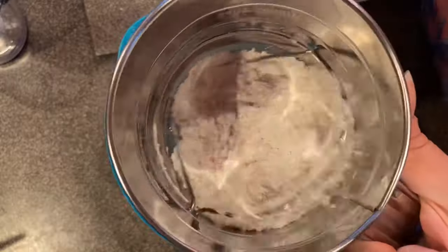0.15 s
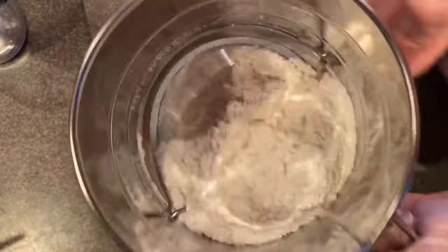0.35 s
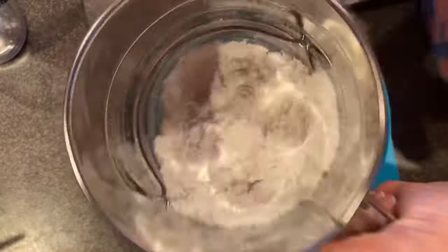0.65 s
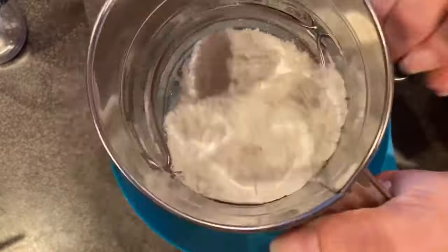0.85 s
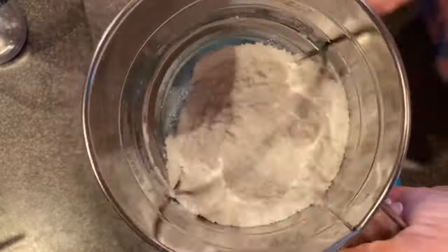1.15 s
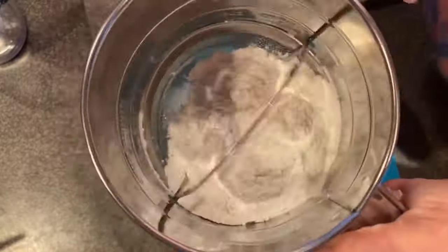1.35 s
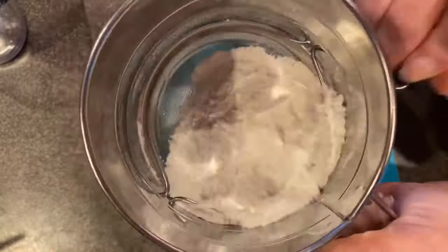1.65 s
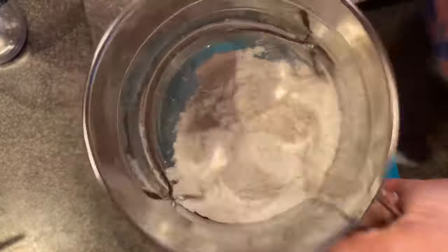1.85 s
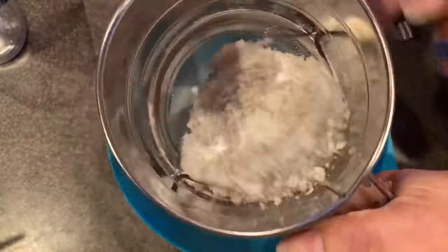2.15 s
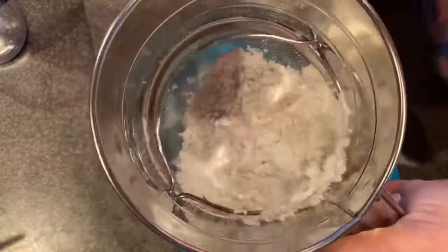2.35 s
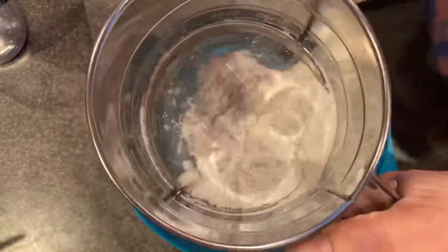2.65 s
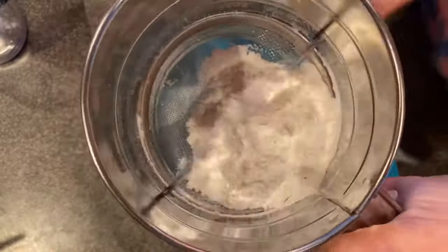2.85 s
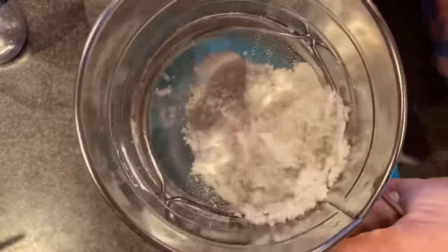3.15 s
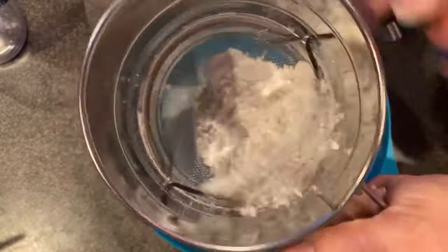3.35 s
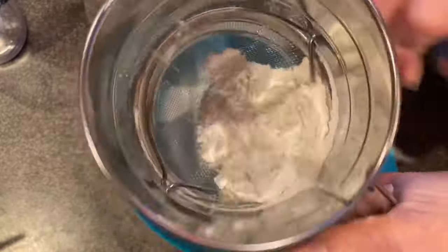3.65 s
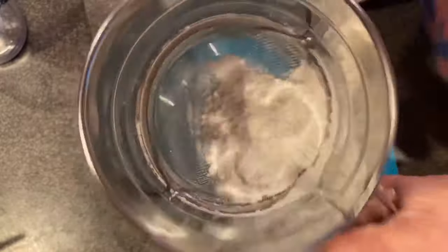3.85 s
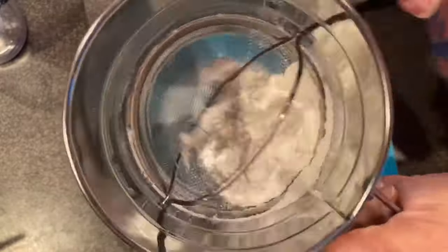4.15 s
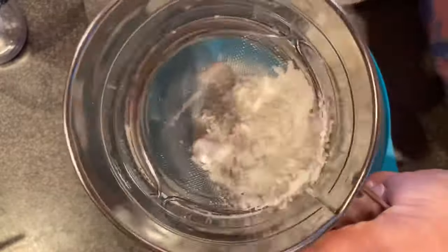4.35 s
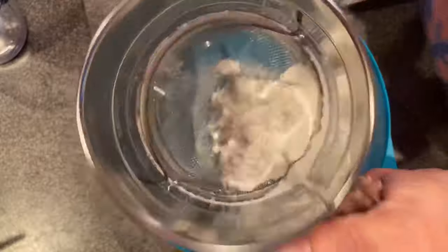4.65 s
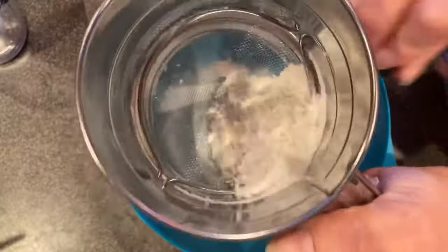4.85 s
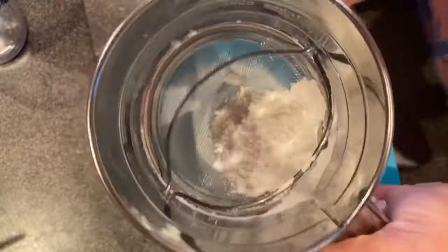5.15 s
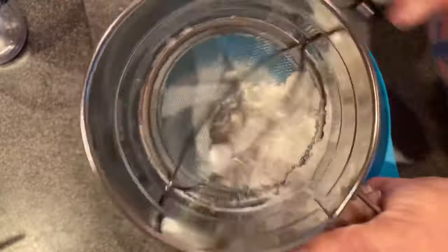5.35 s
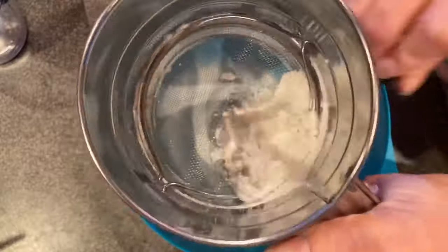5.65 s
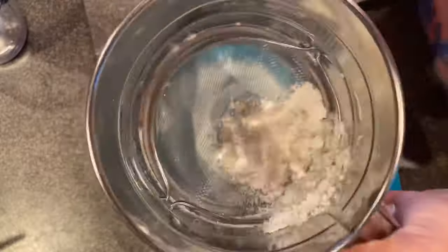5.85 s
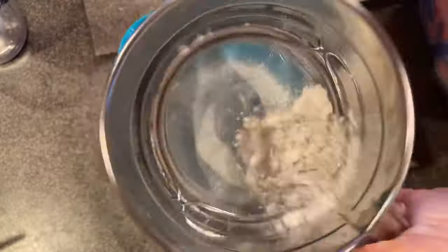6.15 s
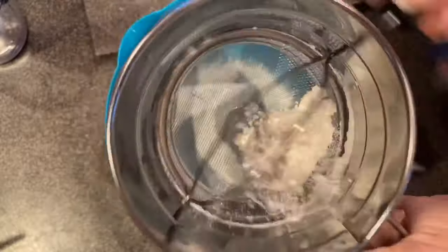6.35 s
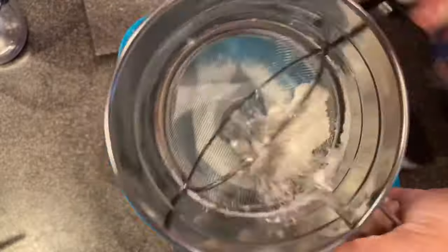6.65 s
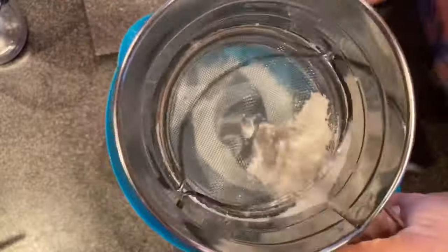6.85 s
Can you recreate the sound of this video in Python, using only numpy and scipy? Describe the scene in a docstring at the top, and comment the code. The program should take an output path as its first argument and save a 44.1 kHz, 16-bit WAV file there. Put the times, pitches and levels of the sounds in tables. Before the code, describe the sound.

A hand-cranked tin sifter scrapes and snaps its wire hoop over fine mesh in quick irregular ticks, with dull handle knocks and a faint low room rumble.

```python
"""A hand-cranked tin flour sifter held under a pair of microphone ports in a quiet kitchen.
It starts on a hard scrape and snag; for a third of a second the can also rattles on the bowl below.
Passes of the wire hoop follow to the end: grit noise and sharp snags drive the resonances of hiss, ring and
boom, each with an after-sound. From half a second until shortly after five, crank and handle knock dully
as damped tones with noise. Shaped noise rumbles low throughout."""
import sys
import numpy as np
from scipy import signal
from scipy.fft import rfft, irfft, next_fast_len
from scipy.io import wavfile

SR = 44100
rng = np.random.default_rng(int(sys.argv[2]) if len(sys.argv) > 2 else 0)


def unload_wav(signal):
    """Save mono or channel-first audio to the path in sys.argv[1] as 16-bit WAV at rate SR, clipped to [-1, 1]."""
    wavfile.write(
        sys.argv[1],
        SR,
        np.round(np.clip(np.atleast_2d(signal).T, -1, 1) * 32767).astype(np.int16),
    )


N = 308259


def from_db(db):
    """Amplitude ratio from dB."""
    return 10 ** (np.asarray(db) / 20)


def rms_one(x):
    """Scale to an rms of 1 over all channels."""
    return x / np.sqrt(np.mean(x ** 2) + 1e-20)


def at_hz(points, hz):
    """Interpolate (hz, value) points over log frequency."""
    points = np.array(points)
    return np.interp(np.log(hz + 1), np.log(points[:, 0] + 1), points[:, 1])


def drift(rate_hz):
    """Random wander of rms 1: noise through two equal one-pole lowpasses."""
    r = np.exp(-2 * np.pi * rate_hz / SR)
    settle = 4000
    noise = rng.standard_normal(N + settle)
    return rms_one(signal.lfilter([1], [1, -2 * r, r * r], noise)[settle:])


def body(x, modes, wander_db):
    """Parallel resonances, signs alternating; each drive shifts with the contact point and the load."""
    out, impulse_response = 0, 0
    emptied = np.arange(N) / N - .5
    impulse = np.eye(1, 4096)[0]
    for k, (hz, width_hz, level_db, change_db) in enumerate(modes):
        r = np.exp(-np.pi * width_hz / SR)
        b = (1 - r * r) / 2 * np.array([1, 0, -1])
        a = [1, -2 * r * np.cos(2 * np.pi * hz / SR), r * r]
        gain = (-1) ** k * from_db(level_db)
        drive_db = change_db * emptied + wander_db * drift(24.4)
        out = out + gain * signal.lfilter(b, a, x * from_db(drive_db))
        impulse_response = impulse_response + gain * signal.lfilter(b, a, impulse)
    return out / np.sqrt(np.sum(impulse_response ** 2))   # white noise about keeps its rms


def hum():
    """Steady rumble of the house: noise shaped in frequency."""
    # hz, density_db
    rumble_spectrum = [(20, -2.5), (45, 1), (70, 0.5), (105, 4), (200, -6.5), (400, -11.5), (1000, -18.5),
                       (4000, -27.5), (16000, -39)]
    level_db = -54
    hz = np.fft.rfftfreq(N, 1 / SR)
    spectrum = rfft(rng.standard_normal((3, N))) * from_db(at_hz(rumble_spectrum, hz))
    return from_db(level_db) * rms_one(irfft(spectrum, N))


def knocks(t60_s, noise_ratio, top_ratio):
    """Soft low thuds of crank and handle: a damped tone with wider noise around it."""
    # start_s, level_db (before the soft onset), pitch_hz
    thuds = [(0.481, -48, 217), (0.585, -34, 182), (0.629, -31, 280), (0.659, -36, 259),
             (0.785, -33.5, 201), (0.83, -37, 208), (0.946, -39, 298), (1.013, -43, 290),
             (1.157, -34.5, 199), (1.201, -36, 260), (1.403, -47, 295), (1.578, -36.5, 230),
             (1.853, -31, 181), (2.053, -39.5, 312), (2.276, -41.5, 380), (2.43, -41, 235),
             (2.577, -40.5, 475), (2.67, -32.5, 288), (2.981, -42, 223), (3.063, -45, 352),
             (3.195, -41.5, 226), (3.23, -40, 159), (3.449, -38, 288), (3.58, -41.5, 250),
             (4.628, -47, 229), (4.998, -42, 250), (5.132, -42, 555), (5.153, -32.5, 238),
             (5.162, -44, 410), (5.18, -39.5, 164), (5.434, -40, 113)]
    onset_s = 0.0051
    out, t = np.zeros((3, N)), np.arange(round(.15 * SR)) / SR
    for start_s, level_db, hz in thuds:
        i = round(start_s * SR)
        shape = from_db(level_db - 60 * t / t60_s) * (1 - np.exp(-t / onset_s))
        band_hz = [hz / 1.22, hz * max(top_ratio, 1.1)]
        band = signal.butter(2, band_hz, "band", fs=SR, output="sos")
        noise = rms_one(signal.sosfilt(band, rng.standard_normal((3, len(t)))))
        tone = np.sin(2 * np.pi * hz * t)
        out[:, i:i + len(t)] += (shape * (tone + noise_ratio * noise))[:, :N - i]
    return out


def clinks():
    """The can touches the bowl: each touch is a dying noise rattle in the same resonances."""
    # start_s, level_db, t60_s
    touches = [(.001, -37, 0.42), (0.173, -32, 0.056), (.177, -51, 0.16), (0.227, -51, 0.11),
               (.26, -56, 0.1), (0.303, -47.5, 0.069), (.322, -61, 0.04)]
    # hz, width_hz, level_db (within the group), change_db (over the scene)
    bowl_modes = [(1880, 320, -6, 0.015), (2510, 150, -5, 0), (2620, 46, 4.5, 0), (4600, 500, -10, 0),
                  (4900, 78, -2.5, 0), (7100, 7700, -18, 0)]
    shake, t = np.zeros(N), np.arange(N) / SR
    for start_s, level_db, t60_s in touches:
        decay_db = 60 * np.clip(t - start_s, 0, 1) / t60_s
        shake += (t >= start_s) * from_db(level_db - decay_db)
    return body(shake * rng.standard_normal((3, N)), bowl_modes, wander_db=1.5)


def walls(tail):
    """The walls return part of the ring's after-sound as broad noise without its resonances."""
    level_db = 1.5   # re the ring's after-sound, before the band filter
    band = signal.butter(1, [700, 6000], "band", fs=SR, output="sos")
    return from_db(level_db) * signal.sosfilt(band, tail * rng.standard_normal((3, N)))


def lingering(drive):
    """Can, counter and walls let the power of every contact die away smoothly."""
    # level_db, t60_s; rows: hiss, ring, boom
    after_sounds = [(-18.5, 0.12), (-14, 0.19), (-10.5, 0.15)]
    out = np.zeros((3, N))
    for k, (level_db, t60_s) in enumerate(after_sounds):
        r = from_db(-120 / (t60_s * SR))   # acts on power: 60 dB per t60
        power = signal.lfilter([1 - r], [1, -r], drive[k] ** 2 + 1e-18)
        out[k] = from_db(level_db) * np.sqrt(power)
    return out


def colour(s, hiss_db, dull_db, laws):
    """Levels in dB of hiss, ring and boom for one contact; harder contact is brighter."""
    medium_db = -35
    at_medium_db, lost, change_db, share = np.transpose(laws)
    harder_db = hiss_db - medium_db
    emptied = s * SR / N - .5
    re_hiss_db = at_medium_db - lost * harder_db + change_db * emptied + share * dull_db
    return hiss_db + np.append(0, re_hiss_db)


def grit(per_s, spread_db):
    """Grains and strands slipping under the wire: one click pattern, three random weightings."""
    sizes = from_db(spread_db * np.minimum(rng.exponential(1, N), 4))
    clicks = sizes * (rng.random(N) < per_s / SR)
    return rms_one(clicks * rng.standard_normal((3, N)))


def pressure(edge_db, steep_in, steep_out):
    """Contact strength for hiss, ring and boom: one hump per pass of the hoop, powers added."""
    # hardest_s, rise_s, fall_s (each to edge_db down), hiss_db, dullness_db
    passes = [(.002, 0.0058, 0.014, -28.5, -7), (.173, 0.018, 0.073, -53.5, -6),
              (0.389, .009, 0.028, -52.5, -18), (0.491, 0.016, 0.018, -43, 1),
              (.585, 0.0054, 0.015, -47, -12), (0.667, 0.052, 0.013, -30, -13),
              (0.821, 0.039, 0.061, -40.5, 1.5), (.949, .018, 0.011, -34, 1),
              (1.031, 0.0032, 0.015, -33, 0.5), (1.215, 0.081, 0.027, -45, 2.5),
              (1.269, .007, .006, -51, -1), (1.325, 0.0062, 0.021, -34.5, 2.5),
              (1.414, 0.0082, 0.014, -36.5, 4), (1.55, 0.0056, 0.051, -50, -1),
              (1.59, 0.0043, 0.048, -37, -1.5), (1.726, 0.014, 0.015, -41.5, 5),
              (1.87, 0.039, 0.033, -42, -4), (2.044, 0.008, 0.06, -34.5, -1.5),
              (2.19, 0.012, 0.022, -40, 0), (2.295, 0.023, .018, -31, 0.5), (2.437, 0.017, 0.048, -36, -2),
              (2.59, 0.019, 0.011, -38, 4), (2.681, 0.019, 0.016, -37.5, 5),
              (2.866, 0.056, .023, -42.5, 2.5), (2.989, 0.023, 0.0032, -36, 3),
              (3.082, .012, 0.0066, -31.5, -2), (3.192, .01, 0.082, -41.5, 1.5),
              (3.36, 0.018, 0.016, -42.5, 4.5), (3.467, 0.014, 0.008, -27.5, 3.5),
              (3.625, .047, 0.018, -40.5, 4), (3.721, 0.02, 0.014, -47, 4.5),
              (3.848, 0.028, 0.0097, -35, 4.5), (4.002, 0.045, 0.028, -39, 0.5),
              (4.112, .025, 0.018, -44, 2.5), (4.24, 0.019, .018, -56, 5), (4.267, 0.011, 0.0091, -41, 10),
              (4.452, 0.039, 0.015, -36, -3), (4.548, 0.011, 0.031, -43, 2),
              (4.653, 0.021, 0.0096, -38.5, 4.5), (4.804, 0.047, 0.021, -40, 2.5),
              (4.9, 0.01, 0.027, -41.5, 4), (5.014, 0.02, 0.0096, -39.5, 6.5),
              (5.135, 0.067, .007, -56, -18), (5.232, 0.052, .024, -41, 0.5), (5.278, .011, 0.012, -46, -8),
              (5.344, 0.016, 0.013, -40.5, -1.5), (5.451, 0.016, 0.0086, -34, 5.5),
              (5.621, 0.045, 0.019, -37, -1), (5.658, .012, .013, -47.5, -5),
              (5.731, 0.025, .017, -37.5, -3), (5.806, .029, 0.012, -45, 6),
              (5.947, 0.038, 0.016, -35.5, -2), (6.046, 0.017, 0.02, -39, -2),
              (6.122, .019, 0.016, -36.5, 4), (6.2, 0.037, .054, -53.5, -18),
              (6.26, 0.025, 0.02, -34.5, -2.5), (6.351, 0.014, 0.028, -38, 1.5),
              (6.427, .015, 0.014, -32, -1), (6.548, .043, 0.021, -34.5, -4),
              (6.641, .015, 0.023, -38.5, 0.5), (6.756, 0.018, 0.0088, -32.5, 2.5),
              (6.909, 0.045, 0.019, -36, -4)]
    # rows ring, boom: re_hiss_db (medium contact), loss_db_per_db (harder contact),
    # change_db (as the flour runs out), dullness_share (0-1)
    pass_colour = [(-2.5, 0.2741, 1, 0.18), (-6.5, .5, -7.5, 0.76)]
    power, t = np.zeros((3, N)), np.arange(N) / SR
    for s, rise_s, fall_s, hiss_db, dull_db in passes:
        near = slice(max(0, int((s - 4 * rise_s) * SR)), int((s + 4 * fall_s) * SR))
        away_s = np.abs(t[near] - s)
        drop = np.where(t[near] < s, (away_s / rise_s) ** steep_in, (away_s / fall_s) ** steep_out)
        peak_db = colour(s, hiss_db, dull_db, pass_colour)[:, None]
        power[:, near] += from_db(peak_db - edge_db * drop) ** 2
    return np.sqrt(power)


def snags(scrape, rise_s, longer, gains_db):
    """Each snag of the wire cracks, swells within milliseconds and dies; lows last longer."""
    # start_s, hiss_db (before gains_db), dullness_db
    clear_snags = [(.001, -20.5, 5.5), (0.166, -30.5, 2), (0.175, -32, -20), (0.1962, -43, 4),
                   (0.2271, -36, 1.5), (.2595, -67, -1), (0.303, -65, 2), (.32, -68, 5), (0.382, -60, -2),
                   (0.3962, -53.5, 8), (.44, -61, 9), (.457, -42, 0), (0.486, -28.5, 4),
                   (0.4855, -28.5, 11.5), (0.5074, -20, -4), (0.5609, -21, -7.5), (.5747, -48, -9),
                   (.5873, -23.5, -1.5), (0.5985, -23, -8), (.6152, -26, -15), (0.6273, -17.5, -2),
                   (0.6535, -18, 7), (0.6645, -8, 7.5), (0.767, -53, -8), (0.7805, -32.5, 4),
                   (0.809, -27, -7), (.8232, -19, -8), (0.8422, -23, 0), (0.878, -38.5, 3.5),
                   (.932, -47, -8), (.9519, -32, 6), (0.9688, -26, -0.5), (.9913, -49, -9),
                   (1.006, -48, 4.5), (1.0227, -21, 1), (1.0662, -40.5, 2), (1.129, -54, 0.5),
                   (1.1441, -28.5, 4), (1.1762, -34, -5), (1.191, -42, -10), (1.206, -28.5, -21),
                   (1.2467, -50, -21), (1.2654, -35, 16), (1.3186, -24, -3), (1.388, -54, 1),
                   (1.4035, -30, -6), (1.4095, -18.5, 1.5), (1.427, -34, -2), (1.45, -50, 6),
                   (1.534, -25, 4.5), (1.547, -28, -10), (1.5704, -41, 4), (1.582, -18.5, -10),
                   (1.6061, -24, 8.5), (1.62, -27, 0), (1.667, -47.5, 4.5), (1.728, -36, 2),
                   (1.744, -35.5, 4.5), (1.8458, -14, 6.5), (1.8643, -33, 2), (1.872, -24.5, -3),
                   (1.8965, -37, 1), (1.9625, -63, 1.5), (1.994, -45.5, 7), (2.016, -50, 5),
                   (2.037, -19, 3), (2.0604, -30, -12), (2.082, -23, 4), (2.1066, -21.5, 6),
                   (2.164, -64, 7), (2.1833, -22.5, 5.5), (2.2569, -23, -6), (2.2727, -44, -12),
                   (2.2849, -25, -4), (2.3, -19, 0.5), (2.3235, -54, 8), (2.4146, -40, 10.5),
                   (2.4281, -20, -4), (2.448, -22.5, -11), (2.459, -43, -8), (2.4696, -21, 5.5),
                   (2.5226, -54, 7), (2.5897, -47, -6), (2.6108, -27, -10), (2.6223, -32, -19),
                   (2.6418, -27.5, 3.5), (2.682, -22.5, -0.5), (2.7936, -43, 7), (2.805, -23.5, -13),
                   (2.826, -37, -15), (2.859, -27, 3), (2.867, -27.5, 2), (2.9144, -46, 3.5),
                   (2.987, -18.5, -10), (2.998, -25, -19), (3.019, -33, -30), (3.053, -23.5, 6.5),
                   (3.072, -32, -7), (3.0822, -16, 6), (3.1057, -38, 5), (3.1846, -20, 5.5),
                   (3.191, -25.5, -5), (3.2196, -23.5, 3), (3.2366, -25, -2), (3.25, -31, -3),
                   (3.259, -30, 6), (3.292, -30, 3.5), (3.3348, -46, 7), (3.3519, -36, -1),
                   (3.3862, -15, -1), (3.411, -32, -3), (3.4403, -21.5, 1), (3.4644, -11.5, 1),
                   (3.579, -40, 1), (3.6287, -30, 9), (3.6584, -40, 3), (3.725, -28.5, 4.5),
                   (3.7924, -47, -3), (3.8416, -17, 5.5), (3.948, -41, 6), (3.999, -16, 6),
                   (4.0843, -49, 4), (4.19, -53, -1), (4.2081, -42.5, -9), (4.224, -46, -7),
                   (4.236, -24.5, 3), (4.236, -23.5, -11), (4.2577, -18, 4), (4.2703, -9, 4),
                   (4.364, -42, -2.5), (4.387, -45.5, 4), (4.4105, -44.5, 16.5), (4.4433, -13.5, 3),
                   (4.459, -27, 2), (4.4845, -38.5, 5), (4.5388, -31, -8), (4.652, -24.5, 12),
                   (4.7513, -35, 9.5), (4.7976, -28, -16), (4.8425, -35, 3.5), (4.8785, -53, -4),
                   (4.8925, -18, -5), (5.005, -27.5, 0), (5.0134, -18, 3), (5.0364, -39, 7.5),
                   (5.0875, -50, 2.5), (5.1344, -51, 10), (5.1808, -32.5, 2.5), (5.2234, -31, -16),
                   (5.266, -50, 2), (5.3419, -45, 0), (5.4166, -53, -7), (5.4514, -21.5, 7.5),
                   (5.538, -38.5, -1), (5.5675, -26.5, 6), (5.7272, -28, 4), (5.8058, -22.5, 12),
                   (5.826, -35.5, 4), (5.874, -49, -5), (5.905, -25.5, 4.5), (5.941, -26, -5),
                   (5.976, -27.5, 9), (6.045, -24.5, -14), (6.1201, -22, -1), (6.1855, -39, -2),
                   (6.206, -40, -4), (6.2386, -37, 15), (6.2607, -37, 4), (6.298, -41, -2),
                   (6.337, -45, -10), (6.3435, -28, -8), (6.4, -45, 4), (6.4299, -22, -4), (6.4735, -43, 2),
                   (6.5154, -26, 11.5), (6.549, -28, -6), (6.5843, -36, 2), (6.636, -24.5, 12.5),
                   (6.7158, -53, -9), (6.7527, -22.5, -6), (6.7749, -41, 9), (6.8681, -26.5, 10),
                   (6.9068, -23.5, -7), (6.947, -31.5, 5)]
    # rows ring, boom: re_hiss_db (medium contact), loss_db_per_db (harder contact),
    # change_db (as the flour runs out), dullness_share (0-1)
    snag_colour = [(-3.5, .45, -3.5, 0.64), (-14, 0.65, -10.5, 0.46)]
    hiss_t60_s = .016
    crack_db, crack_t60_s = -6.5, 0.0017
    faint_per_s, faint_db, faint_spread_db = 13, -10, 3.5   # chance snags, re the scrape under way
    out, t = np.zeros((3, N)), np.arange(round(.08 * SR)) / SR
    t60_s = hiss_t60_s * np.array(longer)[:, None]
    swell = from_db(-60 * t / t60_s) * (1 - np.exp(-t / rise_s))
    shape = swell + from_db(crack_db - 60 * t / crack_t60_s)
    for s, hiss_db, dull_db in clear_snags:
        i = int(s * SR)
        level = from_db(colour(s, hiss_db, dull_db, snag_colour) + gains_db)[:, None]
        out[:, i:i + len(t)] += (level * shape)[:, :N - i]
    sizes = from_db(faint_db + faint_spread_db * np.minimum(rng.exponential(1, N), 3))
    small = (rng.random(N) < faint_per_s / SR) * sizes
    faint = signal.fftconvolve(scrape * small, shape, axes=1)[:, :N]
    return out + np.abs(faint)


def sifter():
    """Scrape, snags and their after-sound drive three groups of resonances of can, mesh and wire."""
    # each: hz, width_hz, level_db (within the group), change_db (as the flour runs out)
    hiss_modes = [(5810, 1070, -10.5, 0.0055), (6650, 450, 1, 1.6), (7040, 670, -1.5, 0.0048),
                  (9000, 1650, 0, 1.1), (11220, 2350, -1, 0), (14560, 1520, 1, 1.2),
                  (14500, 1960, 2.5, 0.39), (15150, 1450, 1.5, 1.8)]
    ring_modes = [(1590, 570, -7, -8.5), (2183, 374, -2, 4), (2560, 433, -3, 6), (3123, 440, -5, 2.5),
                  (4214, 920, -4.5, -3.5), (4538, 273, 4.5, -4), (4727, 690, -8, 6)]
    boom_modes = [(188, 159, -5.5, -2.5), (345, 114, -5.5, -2.5), (538, 170, -3.5, -5),
                  (712, 353, -4.5, -1.5), (994, 276, -1.5, 8)]
    judder = from_db(1.0 * drift(120) + 0.19 * drift(510))   # the hoop chatters as it drags
    scrape = pressure(edge_db=9.5, steep_in=3.1, steep_out=2.74)
    ticking = snags(scrape, rise_s=0.0011, longer=[1.0, 1.5, 2.6], gains_db=[6, 5, 4])
    drive = np.hypot(scrape * judder, ticking)
    slips, smooth = grit(per_s=9000, spread_db=-0.5), rng.standard_normal((3, N))
    tails = lingering(drive)
    out = walls(tails[1])
    groups = zip(drive, tails, [hiss_modes, ring_modes, boom_modes], [1.5, 2.5, 2.2])
    for contact, tail, modes, wander_db in groups:
        out = out + body(slips * contact + smooth * tail, modes, wander_db)
    return out


def ports(x):
    """Ports hear a shared part plus their own; above 7 kHz the left lags, in soft steps up to two turns."""
    # hz, shared_power (0-1)
    likeness = [(60, .92), (250, .94), (500, .4), (1000, .8), (2200, .5), (4500, .7), (5600, .35),
                (7200, .95), (9200, .96), (16000, .75)]
    # hz, left_minus_right_db
    lean = [(60, -2.5), (110, 0), (200, -4), (380, -3), (700, 5.5), (1290, -1), (2380, 2), (4400, 1.0),
            (8120, -0.5), (15000, 0.0)]
    # hz, left_lead_rad
    low_lead = [(200, 0.21), (600, 1.0), (900, 0.41), (1300, 0.97), (2000, 1), (3000, 0.33), (6000, 0.24),
                (7100, 0)]
    # hz, level_db
    port_colour = [(9000, -0.5), (12500, 0), (15700, -0.5)]
    from_hz, hz_per_turn, max_turns, warp_rad = 7150, 4060, 2, .3
    size = next_fast_len(N + 2048)
    hz = np.fft.rfftfreq(size, 1 / SR)
    shared, *own = rfft(x, size)
    alike = np.clip(at_hz(likeness, hz), 0, 1)
    side = np.array([[.5], [-.5]])   # left, right
    turns = np.clip((hz - from_hz) / hz_per_turn, 0, max_turns)
    # the phase lag grows with frequency, more slowly near in phase and antiphase
    lag_rad = 2 * np.pi * turns - warp_rad * np.sin(4 * np.pi * turns) - at_hz(low_lead, hz)
    common = np.sqrt(alike) * shared * np.exp(-1j * side * lag_rad)
    heard = common + np.sqrt(1 - alike) * np.array(own)
    gain_db = side * at_hz(lean, hz) + at_hz(port_colour, hz)
    return irfft(heard * from_db(gain_db), size)[:, :N]


def scene():
    """Sum the sources, each as one shared and two own channels, and hear them at the ports."""
    thuds = knocks(t60_s=0.089, noise_ratio=0.99, top_ratio=2.38)
    return ports(hum() + thuds + clinks() + sifter())


def record(dry):
    """Tanh rounds the highest peaks, then a steep lowpass cuts the top."""
    cutoff_hz = 15900
    lowpass = signal.ellip(12, .5, 85, cutoff_hz, fs=SR, output="sos")   # ripple dB, stopband dB
    return signal.sosfilt(lowpass, np.tanh(dry))


dry = scene()
out = record(dry)
unload_wav(out)
```